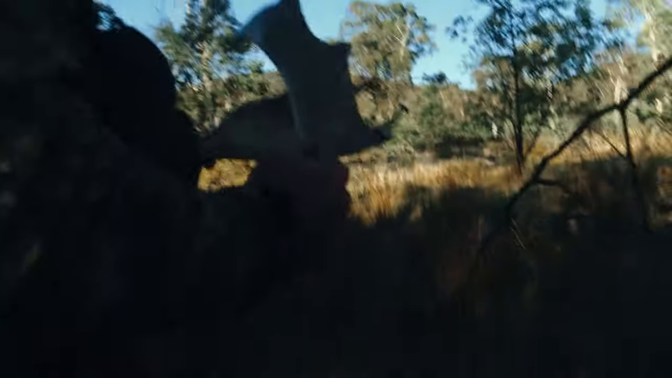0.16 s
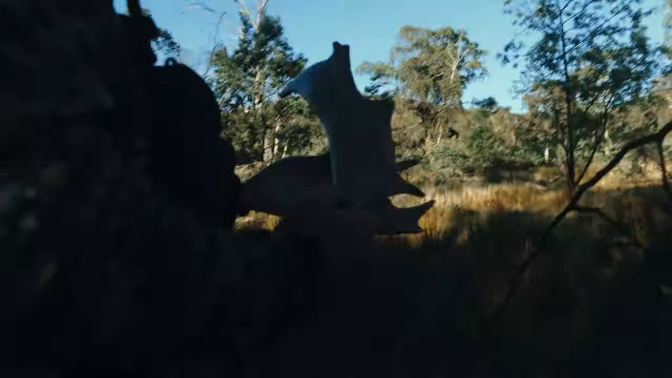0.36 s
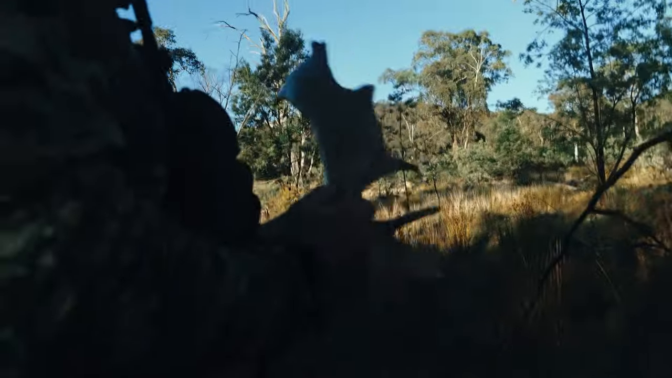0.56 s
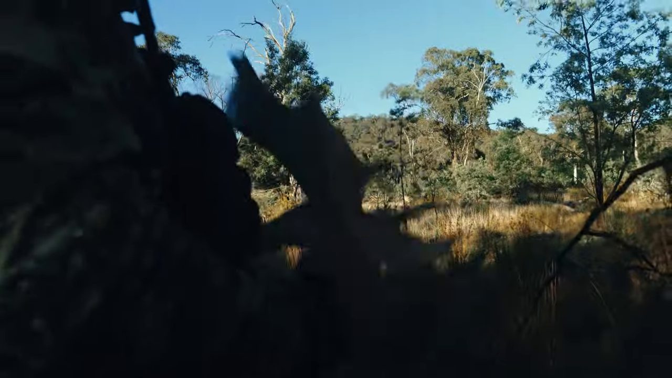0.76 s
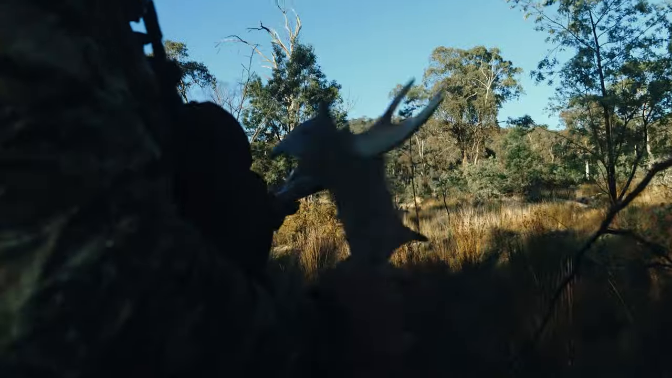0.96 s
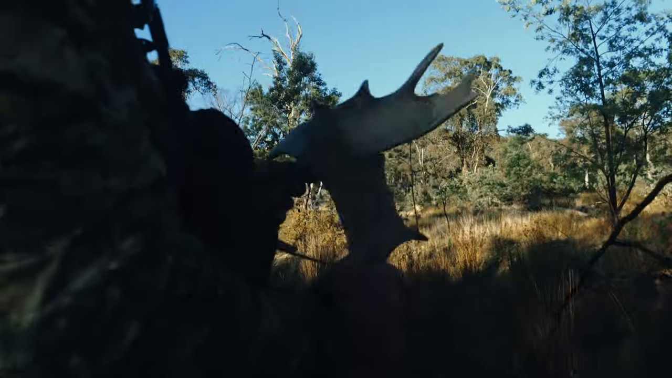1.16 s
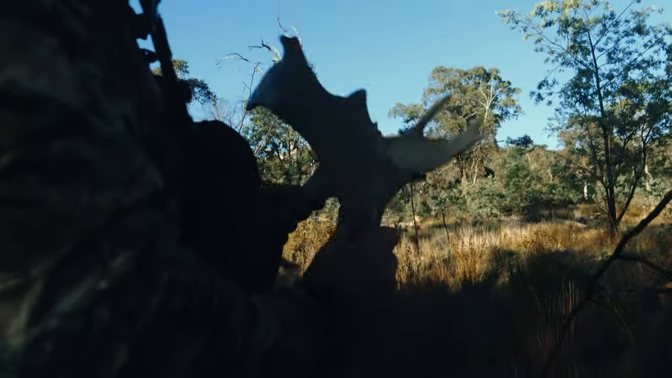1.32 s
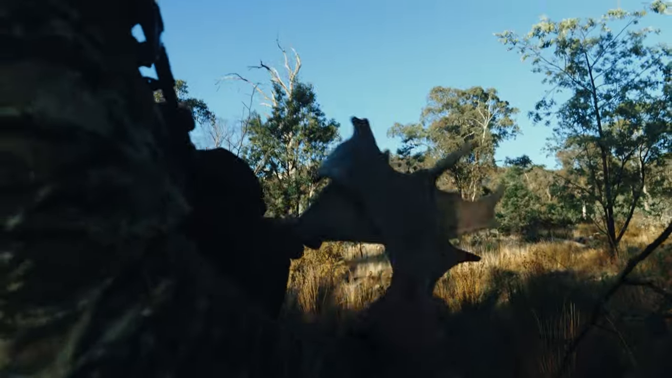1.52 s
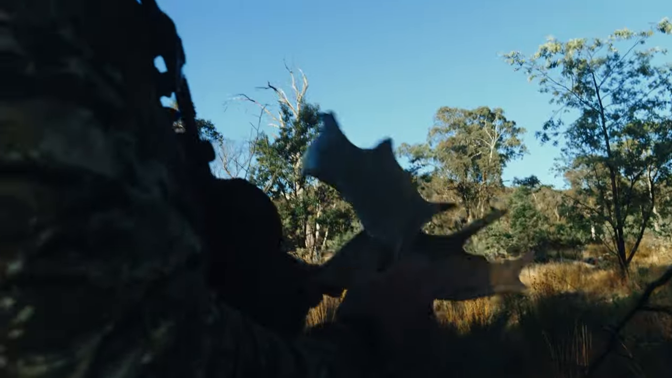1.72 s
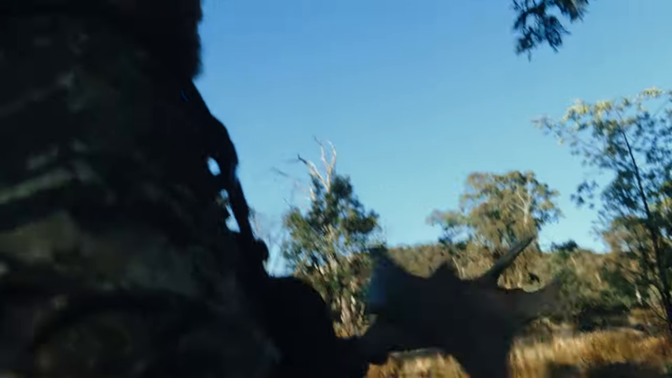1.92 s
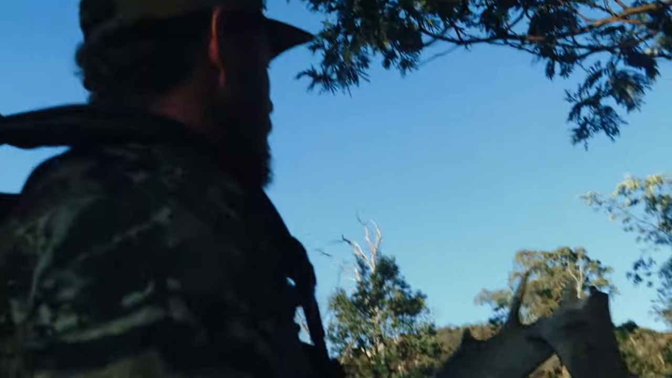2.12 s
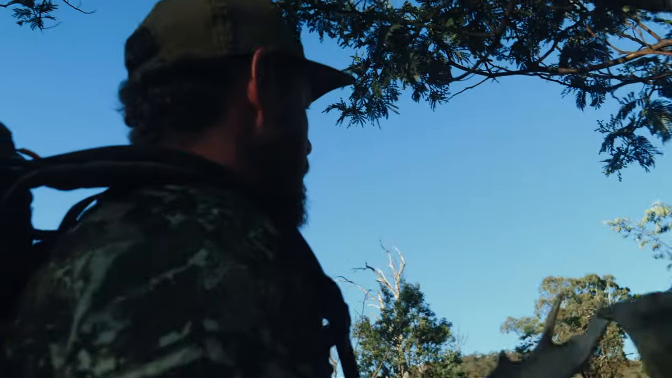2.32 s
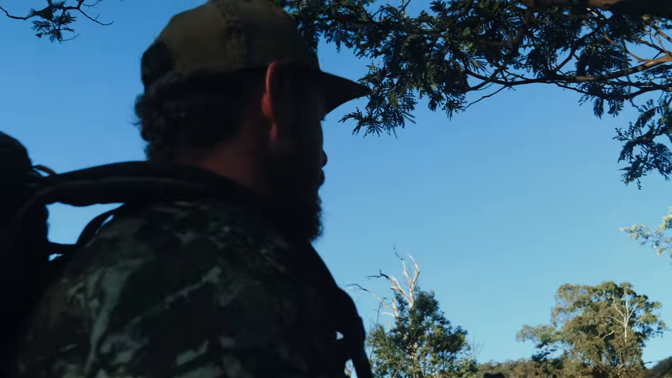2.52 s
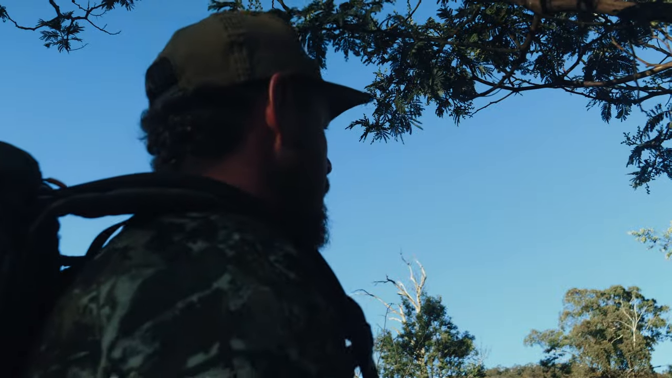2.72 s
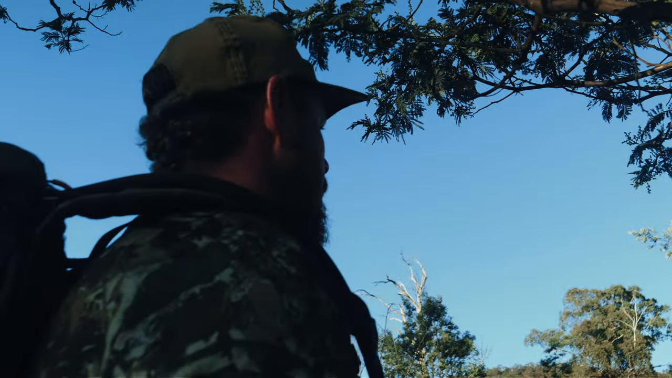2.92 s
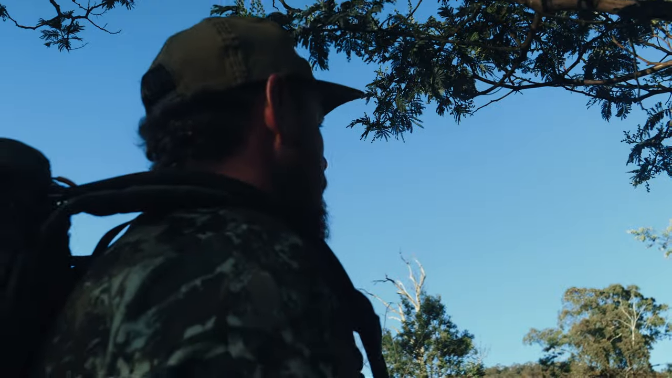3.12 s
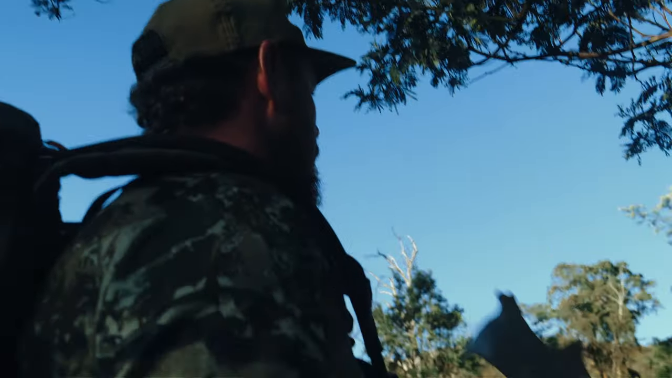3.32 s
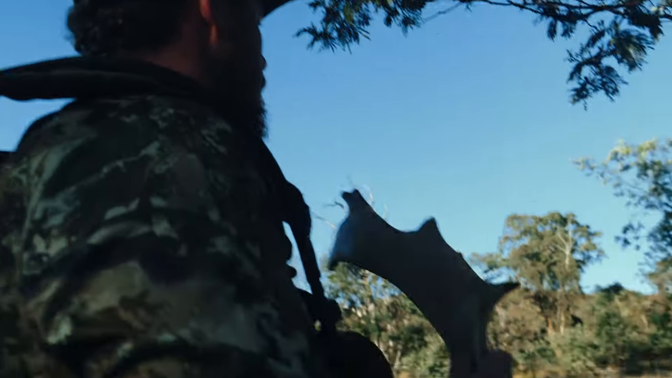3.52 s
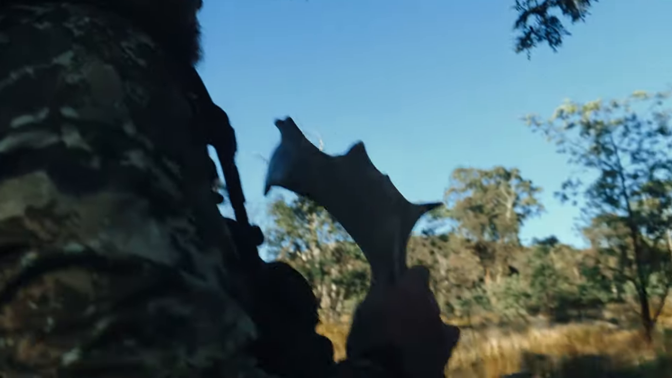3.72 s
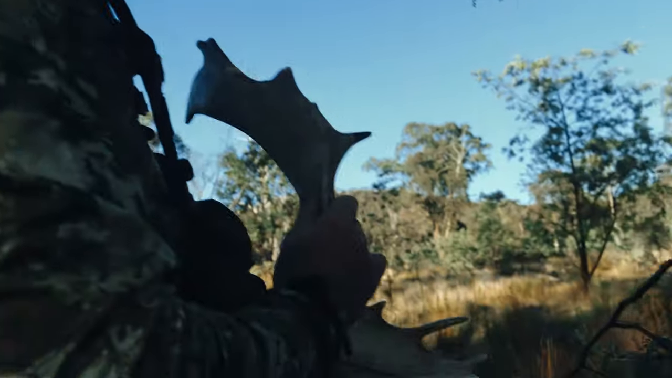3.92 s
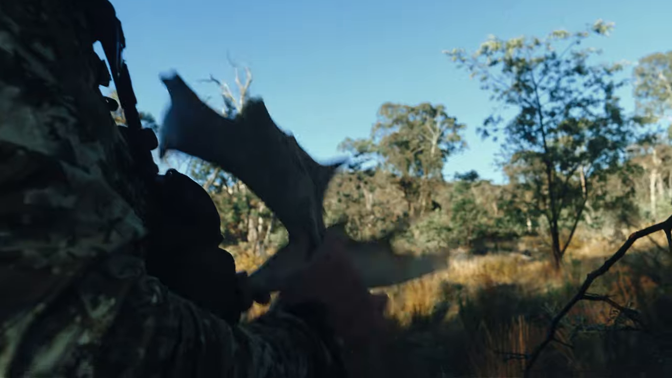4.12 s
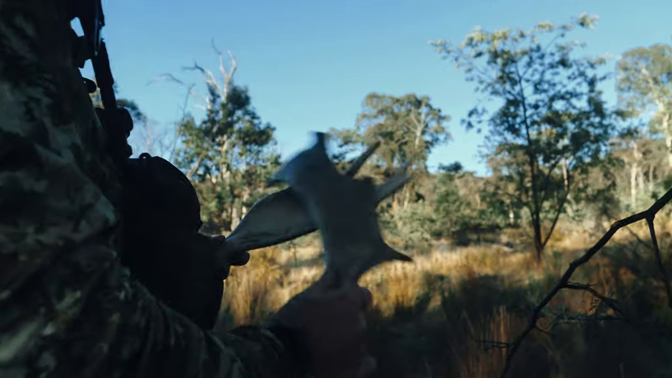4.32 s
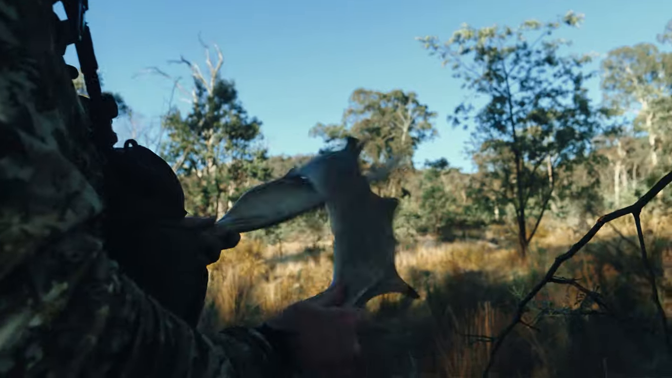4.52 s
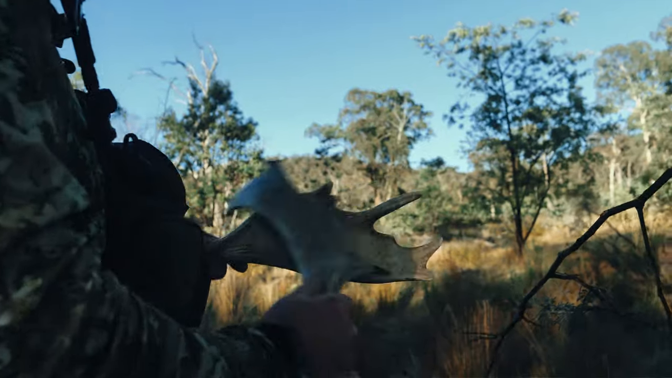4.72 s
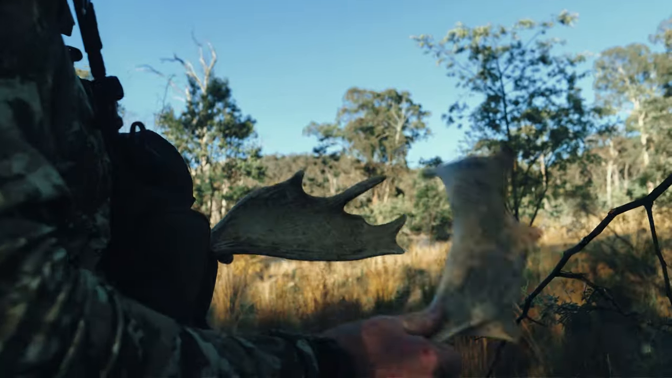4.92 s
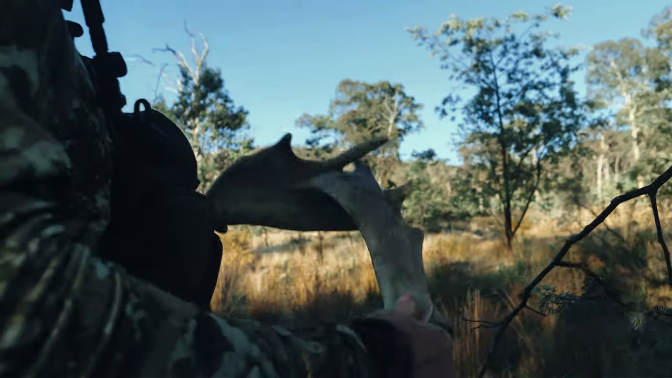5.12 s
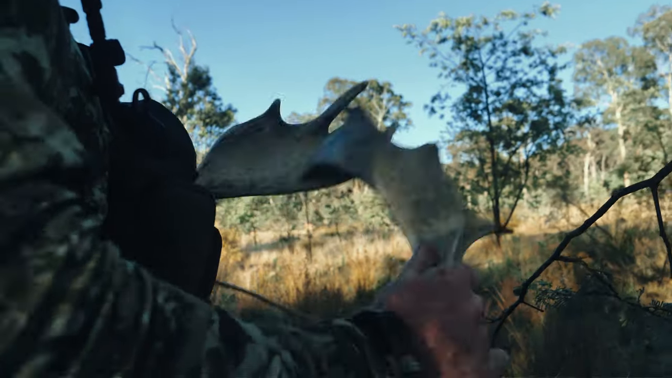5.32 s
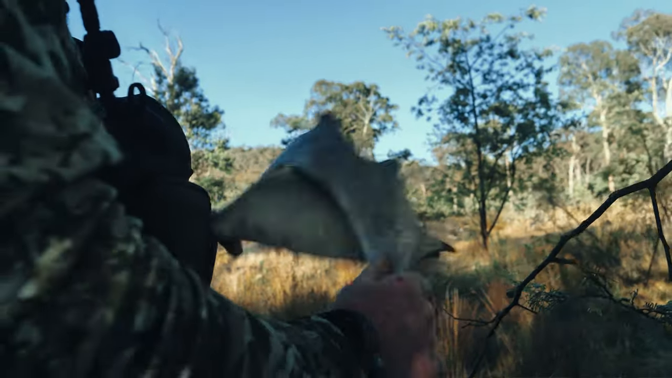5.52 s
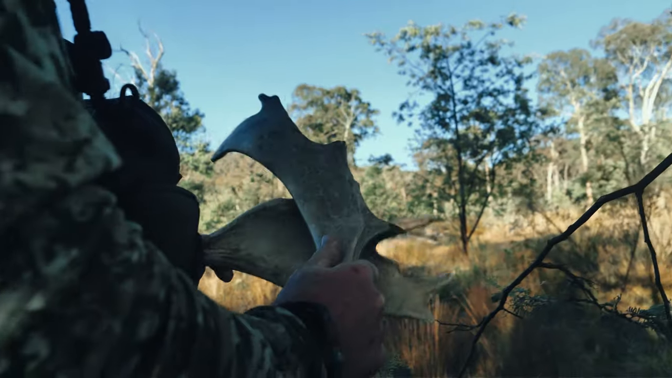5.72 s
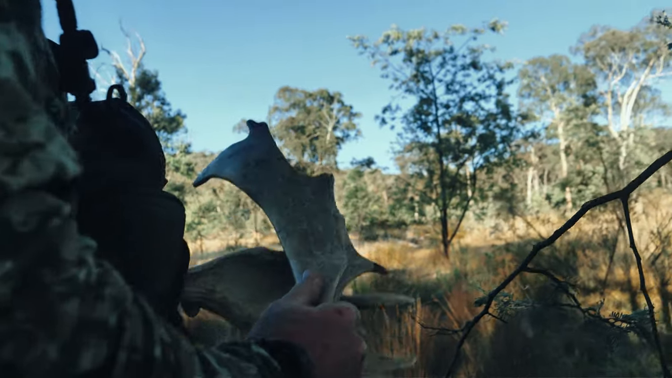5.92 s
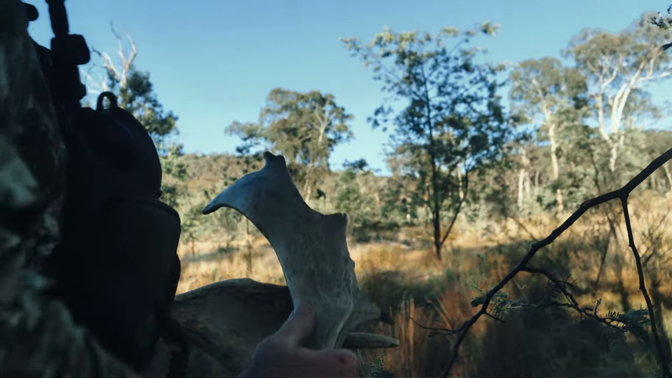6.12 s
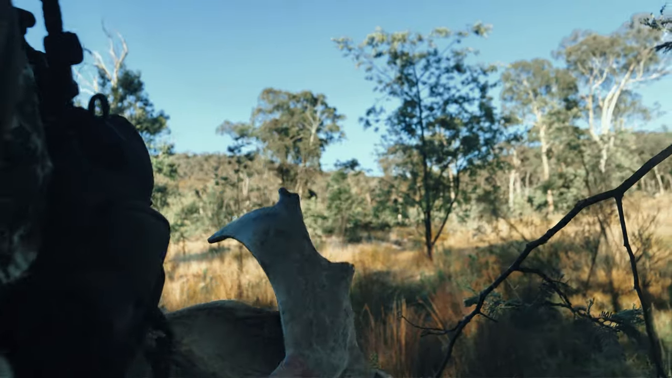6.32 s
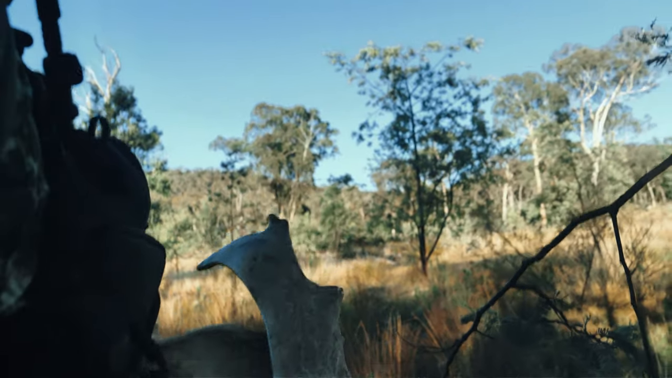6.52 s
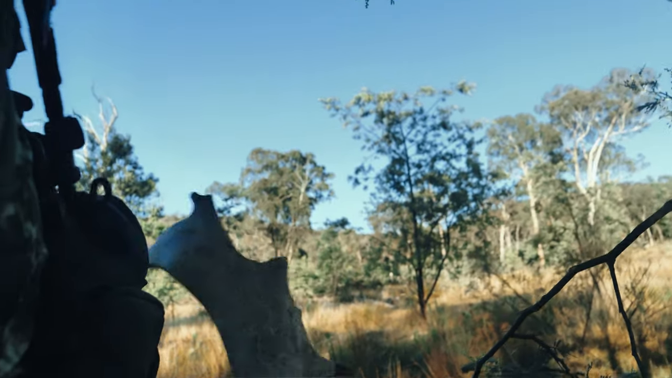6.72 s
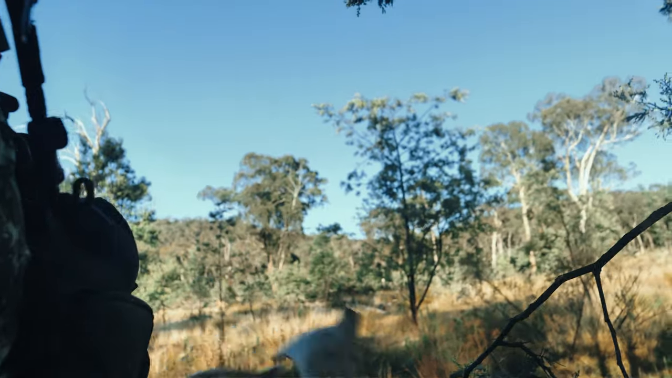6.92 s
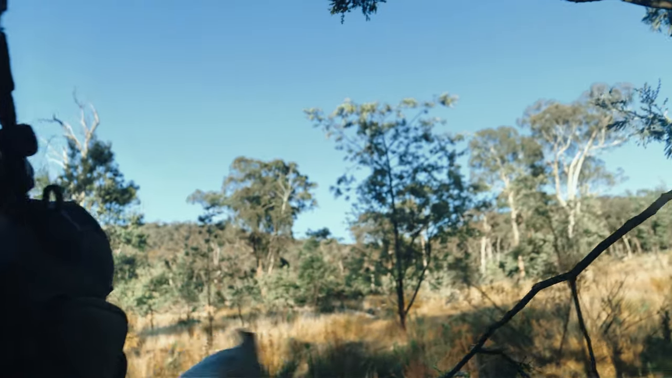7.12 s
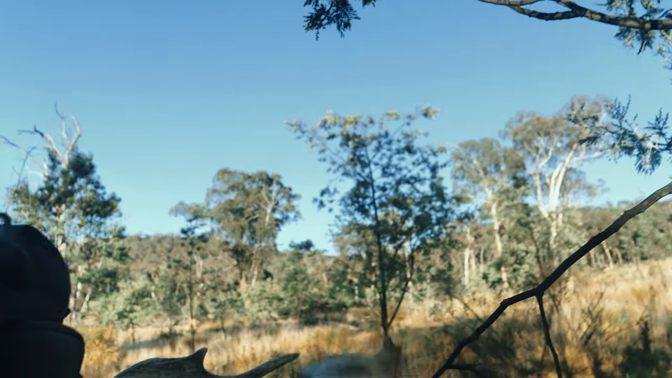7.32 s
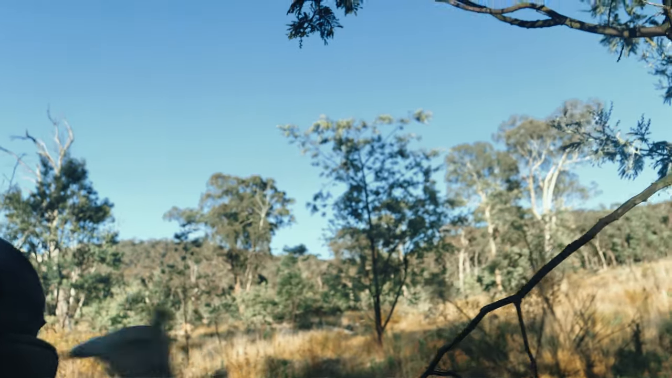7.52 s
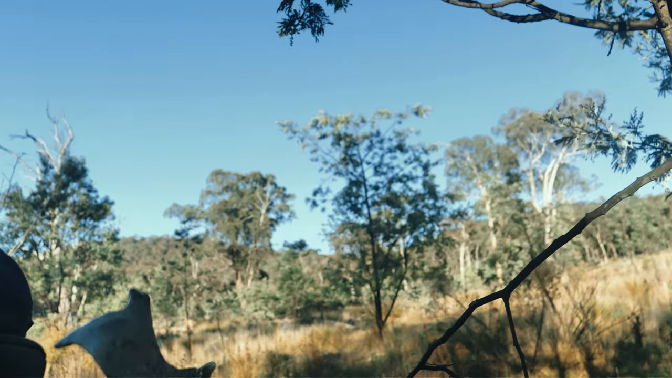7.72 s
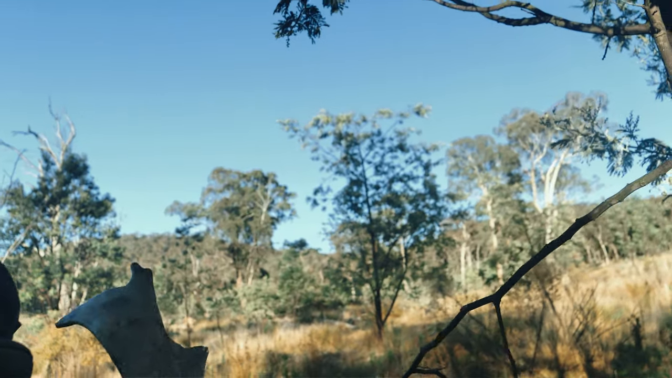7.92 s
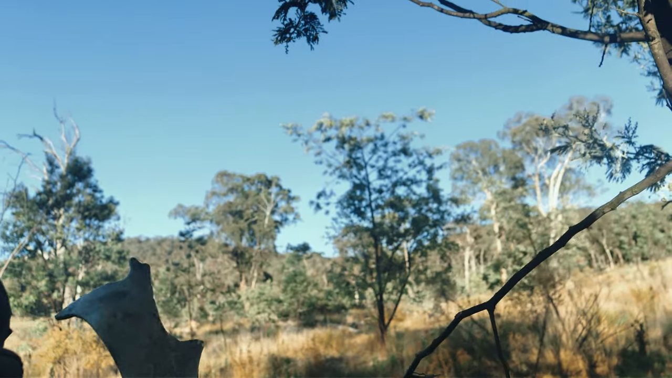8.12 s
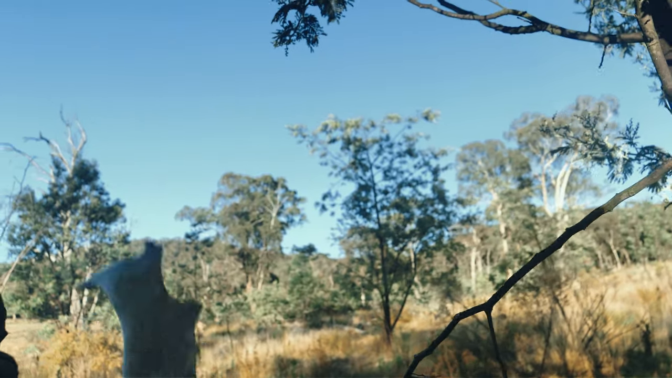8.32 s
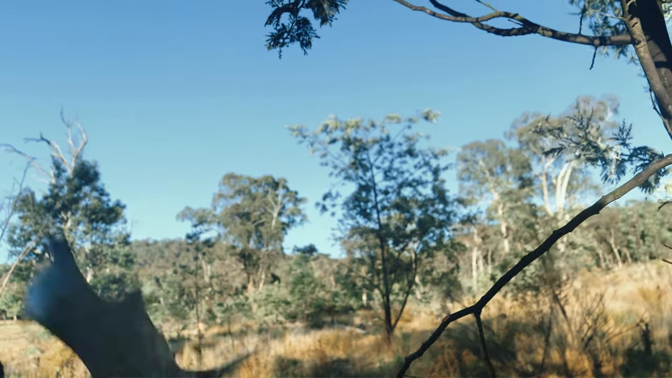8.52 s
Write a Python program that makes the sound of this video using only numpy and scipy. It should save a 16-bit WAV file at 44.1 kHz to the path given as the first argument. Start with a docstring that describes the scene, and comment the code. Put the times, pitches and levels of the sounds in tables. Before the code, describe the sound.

Hard hollow antler knocks come in clattering clusters close to the microphone, separated by quiet gaps with light cloth rustle and soft thuds.

```python
"""Open scrub: two palmate antlers are clashed and rattled in bursts, close to a camera.
Each clash is a cluster of contacts that excite the damped modes of the bone.
The hardest blows overload the microphone, and bushes and trees answer faintly by scattering.
Soft handling bumps, rustling clothes, clicks of gear and a little wind, made of shaped noise
and damped tones, fill the pauses."""
import sys
import numpy as np
from scipy import signal
from scipy.fft import rfft, irfft, next_fast_len
from scipy.io import wavfile
from scipy.ndimage import map_coordinates

SR = 44100
rng = np.random.default_rng(int(sys.argv[2]) if len(sys.argv) > 2 else 0)


def bounce(signal):
    """Save signal as a 16-bit WAV file at the path given by the first command-line argument."""
    frames = np.transpose(np.atleast_2d(signal))
    limited = np.clip(frames, -1, 1)
    pcm = np.round(limited * 32767).astype(np.int16)
    wavfile.write(sys.argv[1], SR, pcm)


N = 377496  # length in samples

# Wind on the microphone. Each row: time in seconds, buffet level in dB before the wind gain.
WIND_LEVEL = [(0.0, -55.5), (0.45, -53.5), (1.1, -68), (2.34, -68), (2.64, -79.5), (3.05, -70),
              (4.1, -65.5), (4.55, -70), (6.79, -67.5), (7.01, -76.5), (7.6, -65.5), (8.56, -72.5)]
# Noise colours of wind, hands, clothes and bush. Each row: frequency in Hz, relative density in dB per Hz.
WIND_COLOUR = [(10, -5.5), (18, 3.5), (30, -6.5), (42, -12.5), (60, -19), (85, -33.5), (130, -47.5),
               (300, -120)]
RUB_COLOUR = [(35, -23.5), (65, 1), (100, -5), (200, -9), (300, -5.5), (450, -15.5), (1200, -32.5),
              (2600, -88)]
CLOTH_COLOUR = [(300, -21.5), (600, -5.5), (1500, -4.5), (2700, -6), (4300, -11.5), (5700, -8),
                (8800, -14.5), (12800, -18), (16000, -30)]
AIR_COLOUR = [(60, -19.5), (110, -9.5), (180, -16.5), (300, -10), (400, -16), (900, -19.5), (1600, -19),
              (4000, -23.5), (7000, -28), (12000, -37), (16000, -46)]
# Shifts of the arms. Each row: middle in seconds, length in seconds, then in dB the rub of the hands,
# the swish of the sleeves and the hiss of the fabric.
ARM_MOVES = [(0.062, 0.16, -55.5, -62, -62.5), (0.38, .2, -62.5, -71.5, -67), (.68, 0.55, -70, -73, -72.5),
             (1.309, .5, -78, -86, -94), (1.801, 0.33, -83, -78.5, -88.5), (2.279, .4, -80, -71.5, -80),
             (3.297, 0.49, -72, -100, -100), (4.02, 0.8, -67, -77.5, -77), (6.0, .22, -94, -77.5, -70),
             (6.234, 0.24, -96, -67.5, -72.5), (6.7, 0.49, -74, -80.5, -84), (7.8, .25, -96, -93, -86),
             (8.248, 0.57, -107, -100, -82)]
# Tiny clicks of gear. Each row: time in seconds, nominal peak level in dB.
GEAR_TICKS = [(0.636, -55), (.73, -59), (2.291, -55), (3.464, -58), (7.955, -56), (8.157, -62.5),
              (8.315, -62.5)]
# Handling bumps. Each row: time in seconds, low thud in dB, dull tap in dB.
HANDLING_BUMPS = [(0.11, -47.5, -44.5), (0.377, -39, -42.5), (0.483, -47.5, -67), (0.838, -49.5, -54),
                  (1.977, -47, -59), (2.254, -55.5, -75), (3.264, -36.5, -56.5), (3.552, -42.5, -57),
                  (3.778, -41.5, -58), (3.848, -39, -56), (3.956, -33, -53.5), (4.228, -34, -48),
                  (5.433, -52, -50.5), (6.54, -35, -56), (6.728, -54, -69.5)]
# Low thumps of the overloaded microphone. Each row: time in seconds, thump in dB,
# time scale of the thump in seconds, slow swing in dB.
OVERLOAD_THUMPS = [(0.888, -32, 0.0026, -33), (1.041, -50.5, 0.0017, -50), (1.501, -40.5, .0014, -51),
                   (2.003, -28.5, 0.0011, -43.5), (4.257, -21.5, 0.0011, -30.5), (5.107, -31.5, .0012, -45),
                   (6.919, -43.5, 0.0012, -63.5), (7.571, -32, 0.001, -58)]
# Scattering by ground and near bushes, then by far trees. Each row: frequency in Hz, t60 in seconds.
SCRUB_DECAY = [(200, 0.14), (1500, 0.07), (5000, 0.15), (14000, 0.1)]
TREE_DECAY = [(200, 0.5), (1500, 2), (4000, 0.6), (8000, .35), (14000, 0.18)]
# Clearest modes of the two antlers. Each row: frequency in Hz, relative level in dB, t60 in seconds,
# share 0-1 that lives in the flat palm. The grip retunes the first row.
BONE_MODES = [(361.9, -13.5, 0.19, 0), (400, -4, 0.039, 0.4), (431.5, -8.5, 0.058, 0.1),
              (587, -8, 0.044, 0.07), (790, -8, 0.026, 0.11), (878, -6, 0.058, 0), (935, -2, 0.032, 0),
              (1250.2, -0.5, 0.054, 0.1), (1310, -4, 0.06, 0), (1465, 1.5, 0.041, 1), (1645, 0, 0.041, .5),
              (1840, 1.5, 0.027, 0.6), (1888, 2.5, 0.022, 1), (2212, -2.5, 0.045, 0.05),
              (2528, -0.5, 0.022, 0.8), (2773, 0, 0.024, 0), (3250, -4, 0.021, 0),
              (3808, -2.5, 0.025, 0.02), (5140, -12, 0.03, 0), (5810, -5, 0.019, 0)]
# Crowd of weaker modes between them. Each row: frequency in Hz, relative level per mode in dB.
CROWD_LEVEL = [(120, -25), (300, -24.5), (700, -9.5), (1100, -9.5), (1700, -12), (2500, -7.5), (3500, -8.5),
               (5200, -9.5), (6500, -18.5), (8200, -14), (10500, -27), (13500, -30), (16000, -31.5)]
# How fast the crowd dies. Each row: frequency in Hz, t60 in seconds.
CROWD_T60 = [(150, 0.0078), (500, 0.018), (1500, 0.042), (4000, 0.022), (9000, 0.017), (15000, 0.012)]
# Where soft contacts sound most. Each row: frequency in Hz, share 0-1.
SOFT_PALM_BAND = [(1200, 0.04), (1500, .8), (1900, 0.94), (2300, 0)]
# The grip changes between clashes. Each row: start in seconds, how freely the palm rings in dB,
# lowest bending note in Hz, how freely that note rings in dB.
GRIPS = [(0, 7, 428, 5), (1.0, -3.5, 385, -6.5), (1.4, 10, 366, 2.5), (1.9, 0, 385, 1.5), (2.4, 3, 365, -3),
         (4.1, -2, 368, -0.5), (4.41, -0.5, 380, -0.5), (4.6, -0.5, 420, -0.5), (5.0, -3, 355, 0.5),
         (5.5, -1, 360, 0.5), (6.8, -1, 365, 2), (7.22, -8.5, 358, -2), (7.5, 0, 364, -1)]
# Tines sliding or lightly rattling: dense catches scrape, sparse ones click. Each row: start in seconds,
# end in seconds, mean grain level in dB before the overall antler gain, bright tilt in dB,
# catches per second.
TINE_CATCHES = [(1.053, 1.094, -55, -13, 400), (1.195, 1.238, -59, -16.5, 440), (1.56, 1.594, -45, -8, 640),
                (1.621, 1.685, -48.5, -6, 73), (2.872, 2.976, -68, -36, 200),
                (4.258, 4.318, -44.5, 1.5, 400), (4.331, 4.379, -44, 5, 97), (4.454, 4.485, -38.5, -9, 304),
                (4.494, 4.54, -56, -13.5, 380), (4.539, 4.573, -45, -8, 370), (4.653, 4.729, -46, -7, 300),
                (4.735, 4.788, -52, -4, 270), (5.122, 5.165, -48.5, 4.5, 430),
                (5.611, 5.684, -40.5, -1, 105), (6.99, 7.061, -48.5, -2.5, 107),
                (7.111, 7.224, -49, -8, 220), (7.255, 7.27, -40.5, 17.5, 200),
                (7.6, 7.671, -42.5, -12, 300)]
# Antler on antler. Each row: time in seconds, blow level in dB before the overall antler gain, body tilt
# in dB (more when the palm is hit), bright tilt in dB (more when hard tines meet), frequency in Hz that
# the struck spot favours, level in dB of each bounce over the contact before.
ANTLER_BLOWS = [(0.8872, -8, -2, 6.5, 1982, -29.5), (0.9576, -27.5, 2.5, 6.5, 1330, -18),
                (1.0373, -19, 8, -10, 1446, -20.5), (1.103, -31.5, -3.5, 2, 3240, -15),
                (1.1168, -29, -4.5, 9, 3180, -9.5), (1.1934, -31, 12.5, -19.5, 1690, -9),
                (1.5036, -9.5, -4.5, 7.5, 1552, -22.5), (1.5428, -26.5, -15, -4, 1780, -14.5),
                (1.5529, -18.5, -10.5, 1.5, 1650, -16), (1.5764, -29.5, -5, -0.5, 1960, -12),
                (1.6539, -38, -7, -11.5, 1400, -19), (1.9951, -8, -11, 9, 2146, -22.5),
                (2.02, -28, 0.5, 2, 1450, -15.5), (2.0611, -25, -7, 4, 1260, -22.5),
                (2.0972, -35.5, 10, 13, 3630, -21), (2.118, -28.5, 0, 6, 1276, -9),
                (2.134, -28.5, 3, 12, 3460, -11.5), (2.4758, -13, -7.5, 9.5, 1290, -25.5),
                (2.4822, -19, -1.5, -11, 1767, -5), (2.5086, -24, -12, 0, 1558, -19),
                (2.5154, -24.5, -1, -7.5, 1645, -5), (2.621, -51.5, 6, -28, 1910, -20),
                (2.718, -54.5, 10.5, -16, 1595, -3), (2.944, -52.5, 13, -28, 1542, -13),
                (4.25, -11.5, -7.5, 13.5, 2856, -20.5), (4.2569, -13, -5, 0.5, 2230, -20),
                (4.2789, -25, -7.5, -2.5, 1650, -18), (4.2975, -30, -3.5, 6, 3120, -11.5),
                (4.3519, -31.5, -4, -5, 2010, -19), (4.379, -32, 3.5, -9, 1960, -6.5),
                (4.4432, -15.5, -10.5, -10.5, 2260, -20.5), (4.4505, -20, -12, -0.5, 3100, -11),
                (4.5778, -20.5, -4, 2, 5100, -22.5), (4.6145, -17, -3, 2.5, 1260, -23.5),
                (4.6496, -25.5, 4, 11, 5100, -6.5), (4.6581, -19.5, -7.5, -12.5, 1380, -13),
                (4.6626, -25.5, 3, 10.5, 1460, -11.5), (4.6848, -29, 1, 1.5, 1830, -7.5),
                (4.695, -17, 2.5, 7, 1900, -13.5), (4.7119, -28, 12, 4.5, 898, -13.5),
                (4.7212, -28, -2.5, -2, 3870, -5), (4.7963, -24, -5, -10, 1223, -22.5),
                (4.8139, -27, 0, -12, 1310, -22), (5.1072, -17, 3, 8, 4973, -19),
                (5.1125, -13, -6.5, 2, 2900, -11), (5.1458, -31.5, 13.5, 1, 1880, -13.5),
                (5.1518, -23, -2, -10, 2670, -9), (5.177, -35.5, -0.5, -7.5, 1860, -8.5),
                (5.343, -31.5, 10, -6.5, 940, -8), (5.3585, -21, -4, -5.5, 1900, -11.5),
                (5.3683, -11, -7, 10, 3170, -16), (5.57, -15, -0.5, 11, 3090, -21),
                (5.575, -14.5, 4, 1.5, 3180, -20), (5.6064, -18, -5, 0.5, 1710, -7),
                (5.641, -24.5, 0.5, 2, 2840, -8), (5.6659, -33, 9, -4, 1620, -16),
                (5.726, -45, 13, -14, 1446, -10), (5.789, -56.5, 12, -5, 1430, -7),
                (6.92, -10.5, 0.5, 10, 2258, -16), (6.9448, -25, -2.5, 6, 1890, -15),
                (6.9592, -32, -9, 5.5, 1850, -9), (6.9741, -23, -5, -7, 1860, -14.5),
                (6.9825, -28.5, -1, 3.5, 1780, -6), (7.0604, -33, 6.5, -1.5, 1915, -12.5),
                (7.1058, -22, 0.5, -5, 1795, -31), (7.136, -29, 8, -4.5, 1890, -19),
                (7.163, -20, 2.5, 7, 4900, -21.5), (7.178, -30, -4.5, 5.5, 2340, -1),
                (7.2375, -16, 0.5, 1, 3920, -10.5), (7.2701, -21, 4, 11, 3890, -14),
                (7.2952, -23.5, 7.5, 11, 1885, -25.5), (7.572, -12, -0.5, 8, 5490, -14),
                (7.602, -25, -4, 4, 1546, -17), (7.616, -32.5, 0, 4.5, 1700, 2),
                (7.6529, -32, -2, -2.5, 1840, -10)]

TOP_HZ = 16300  # the sound holds nothing above about 16 kHz
HISS_HZ = 4200  # where the swish gives way to the hiss
PALM_HZ = 1810  # bounces and slips ring the palm most
DETUNE = .018  # spread, as a share, of the tine modes under a new grip; the palm keeps its pitch
# tines spring apart and meet again: first flight, next flight over it, its random spread, treble lost
BOUNCE_S, BOUNCE_SHRINK, BOUNCE_SPREAD, BOUNCE_DULL_DB = .007, 0.95, .06, 3.5


def amp(db):
    """Logarithmic level: decibels to an amplitude gain."""
    return np.exp(np.asarray(db) * (np.log(10) / 20))


def unit(x):
    """Normalised power: scale to rms 1."""
    return x / np.sqrt(np.mean(x ** 2) + 1e-20)


def along(points, hz):
    """Logarithmic pitch: interpolate (Hz, value) points on a log axis."""
    f, v = np.transpose(points)
    return np.interp(np.log(hz + 1), np.log(f + 1), v)


def curve(rows):
    """Linear interpolation: one value per sample from (seconds, value) rows."""
    return np.interp(np.arange(N) / SR, *np.transpose(rows))


def wobble(rate):
    """Slow random fluctuation: a smooth curve through rate random knots a second."""
    knots = rng.standard_normal(int(N * rate / SR) + 4)
    return map_coordinates(knots, [np.arange(N) * rate / SR])


def filtered(x, response):
    """Linear filtering: the spectrum of x times a response of frequency."""
    m = next_fast_len(N + SR // 2)
    spectrum = rfft(x, m) * response(np.fft.rfftfreq(m, 1 / SR))
    return irfft(spectrum, m)[:N]


def noise(spectrum):
    """Spectral shaping: random noise of rms 1 with the given colour."""
    white = rng.standard_normal(N)
    return unit(filtered(white, lambda hz: amp(along(spectrum, hz))))


def placed(times, sounds):
    """Superposition: add each sound to the time line at its moment."""
    out = np.zeros(N + SR)
    for s, sound in zip(times, sounds):
        out[round(s * SR):][:len(sound)] += sound
    return out[:N]


def movements():
    """Amplitude modulation: rub, swish and hiss swell and fade as bell curves with each arm move."""
    middle, length, *levels_db = np.transpose(ARM_MOVES)
    from_middle = np.arange(N) / SR - middle[:, None]
    swells = np.exp(-2 * (from_middle / length[:, None]) ** 2)
    return np.sqrt(amp(levels_db) ** 2 @ swells ** 2)  # moves that overlap add in power


def surroundings(wind_db=5, rub_db=0, cloth_db=0, air_db=-78.0, lumps_db=3):
    """Turbulence and friction as modulated noise: wind on the microphone, hands, clothes, faint bush hiss."""
    grip_db, folds_db = 2.5 * wobble(22), 1.3 * wobble(35)
    rubbing, swishing, hissing = movements()
    wind = amp(curve(WIND_LEVEL) + wind_db + lumps_db * wobble(8)) * noise(WIND_COLOUR)
    rub = rubbing * amp(rub_db + grip_db) * noise(RUB_COLOUR)
    fabric = noise(CLOTH_COLOUR)
    swish = filtered(fabric, lambda hz: 1 / (1 + (hz / HISS_HZ) ** 6))
    hiss = fabric - swish
    cloth = amp(cloth_db + folds_db) * (swishing * swish + hissing * hiss)
    return wind + rub + cloth + amp(air_db) * noise(AIR_COLOUR)


def ticks(t60=0.021):
    """Impulsive excitation: straps and buckles give thin clicks, noise under an exponential decay."""
    s, peak_db = np.transpose(GEAR_TICKS)
    t = np.arange(SR // 20) / SR
    # 7 dB allows for noise peaks above the rms
    decays = amp(peak_db[:, None] - 7 - 60 * t / t60)
    return placed(s, decays) * noise([(500, -25), (3000, 8), (7000, -3), (13000, -6), (16000, -20)])


def bumps(thud_hz=192, thud_t60=0.066, tap_t60=0.06):
    """Damped resonance: a soft push rings one low mode of the camera body, with a dull tap on top."""
    s, thud_db, tap_db = np.transpose(HANDLING_BUMPS)
    t = np.arange(SR // 8) / SR
    hz = thud_hz * (1 + .05 * rng.standard_normal((len(s), 1)))
    thud = np.sin(2 * np.pi * hz * t) * amp(-60 * t / thud_t60) * (1 - np.exp(-t / .001))
    tap = noise([(60, 1.0), (350, -8.5), (800, -14.0), (2500, -47), (9000, -54.5)])
    tap_decays = amp(tap_db[:, None] - 60 * t / tap_t60)
    return placed(s, amp(thud_db)[:, None] * thud) + tap * placed(s, tap_decays)


def overload_thumps(swing_hz=23, swing_t60=0.15):
    """Overload and recovery: a low thump as the microphone is driven, then its slow swing back to rest."""
    s, thump_db, thump_s, swing_db = np.transpose(OVERLOAD_THUMPS)
    t = np.arange(SR // 2) / SR
    u = t / thump_s[:, None]
    thump = (2 - u) * u * np.exp(1 - u)
    swing = np.sin(2 * np.pi * swing_hz * t) * amp(-60 * t / swing_t60)
    return placed(s, amp(thump_db)[:, None] * thump + amp(swing_db)[:, None] * swing)


def scattered(x, decay, build):
    """Diffuse scattering: weak reflections build up over milliseconds and die at a speed set by frequency."""
    # the tail ends at 1.5 s
    hz, t, z = signal.stft(rng.standard_normal(SR * 3 // 2), SR, nperseg=256)
    fade = amp(-60 * t / along(decay, hz)[:, None]) * (1 - np.exp(-t / build))
    tail = signal.istft(z * fade, SR, nperseg=256)[1]
    return signal.fftconvolve(x, tail / np.linalg.norm(tail))[:N]


def catches(scatter_db=3.5, body_db=-2, count=28):
    """Intermittent contact: tines slide or rattle in tiny uneven catches; dense ones scrape, sparse ones click."""
    rows = []
    for start, end, grain_db, bright_db, rate in TINE_CATCHES:
        when = start + (np.arange(count) + rng.random(count)) / rate
        catch_db = grain_db + scatter_db * rng.standard_normal(count)
        size_db = np.where(when < end, catch_db, -np.inf)  # silent after the end
        rows += [(s, db, body_db, bright_db, PALM_HZ) for s, db in zip(when, size_db)]
    return rows


def contacts(count=2):
    """Inelastic rebound: each blow is followed by bounces, duller and mostly weaker, after shrinking flights."""
    rows = []
    for s, blow_db, body_db, bright_db, favour_hz, bounce_db in ANTLER_BLOWS:
        rows.append((s, blow_db, body_db, bright_db, favour_hz))
        spread = np.exp(BOUNCE_SPREAD * rng.standard_normal(count))
        flights = BOUNCE_S * BOUNCE_SHRINK ** np.arange(count) * spread
        for k, later in enumerate(np.cumsum(flights), 1):
            rows.append((s + later, blow_db + k * bounce_db, body_db, bright_db - k * BOUNCE_DULL_DB, PALM_HZ))
    return rows


def antler_modes(count=260):
    """Modal density: pitch, level, decay and palm share of the clear modes and the crowd of weaker ones."""
    steps = (np.arange(count) + rng.random(count)) / count
    hz = 100 + (TOP_HZ - 100) * steps ** 1.6
    crowd = np.transpose([hz, along(CROWD_LEVEL, hz), along(CROWD_T60, hz), np.zeros(count)])
    return np.vstack([BONE_MODES, crowd]).T


def mode_strengths(hits, modes, palm_db, spot_db=3.5, focus_db=9.0, focus_octaves=0.052, sharpen=0.32,
                   soft_palm_db=3):
    """Modal participation: each contact lands on a new spot and drives modes with new strengths and signs."""
    _, blow_db, body_db, bright_db, favour_hz = hits.T[:, :, None]
    hz, mode_db, _, palm_share = modes
    # the broad palm gives body, hard tines give treble
    body = body_db * along([(600, 0.96), (1300, 0.015)], hz)
    bright = bright_db * along([(1800, 0.013), (6000, 0.99)], hz)
    # a stronger blow is shorter and reaches higher
    top = sharpen * (np.maximum(blow_db, -80) + 20.5) * along([(8000, 0), (14000, 1)], hz)
    softness = np.interp(blow_db, [-40, -20], [1, 0])
    palm = palm_db * palm_share + soft_palm_db * softness * along(SOFT_PALM_BAND, hz)
    # modes that swing widely at the struck spot take most of the blow
    spot = focus_db * np.exp(-.5 * (np.log2(hz / favour_hz) / focus_octaves) ** 2)
    spot = spot + spot_db * rng.standard_normal(spot.shape)
    signs = np.sign(rng.standard_normal(spot.shape))
    return signs * amp(mode_db + body + bright + top + palm + spot)


def mode_fades(modes, attack=.00005, crack=1.0, crack_time=.0012):
    """Exponential damping: each mode dies at its own speed, after a sharp crack from the struck spot."""
    hz, _, t60, _ = modes
    t = np.arange(SR // 9) / SR
    fades = amp(-60 * t / t60[:, None]) * (1 - np.exp(-t / attack))
    crack_share = along([(500, 0.1), (4000, 1.1), (12000, 2.3)], hz)[:, None]
    return fades * (1 + crack * crack_share * np.exp(-t / crack_time))


def mode_tones(modes, low_hz, low_db, size):
    """Boundary conditions: the grip shifts the tine modes and sets pitch and level of the lowest bending note."""
    hz, _, _, palm_share = modes
    held_hz = hz * (1 + DETUNE * (1 - palm_share) * rng.standard_normal(len(hz)))
    held_hz[0] = low_hz
    radians_per_sample = np.float32(2 * np.pi * held_hz / SR)
    tones = np.sin(np.outer(radians_per_sample, np.arange(size, dtype=np.float32)))
    tones[0] *= amp(low_db)
    return tones


def antlers(gain_db=-2.0, bass_cut_hz=250):
    """Modal superposition: blows, bounces and catches ring the same bone, held in the grip of the moment."""
    every_hit, modes = np.vstack([contacts(), catches()]), antler_modes()
    grip_of_hit = np.searchsorted(np.transpose(GRIPS)[0], every_hit[:, 0]) - 1
    clash, fades = np.zeros(N), mode_fades(modes)
    for k, (_, palm_db, low_hz, low_db) in enumerate(GRIPS):
        hits = every_hit[grip_of_hit == k]
        strengths = mode_strengths(hits, modes, palm_db)
        rings = strengths @ (fades * mode_tones(modes, low_hz, low_db, size=fades.shape[1]))
        # the blow sets the level of the first four milliseconds
        onset = np.sqrt(np.mean(rings[:, :SR // 250] ** 2, axis=1))
        gains = amp(hits[:, 1] + gain_db) / onset
        clash += placed(hits[:, 0], rings * gains[:, None])
    # narrow bone radiates little bass
    return signal.sosfilt(signal.butter(3, bass_cut_hz, 'high', fs=SR, output='sos'), clash)


def scene():
    """Superposition: the small sounds around, echoes from bushes and trees, and the antlers."""
    clash = antlers()
    near = amp(-33.5) * scattered(clash, SCRUB_DECAY, build=0.01)
    far = amp(-49.5) * scattered(clash, TREE_DECAY, build=0.032)
    return (surroundings() + ticks() + bumps() + overload_thumps() + far + near + clash)[None]


def record(dry, ceiling=.345):
    """Saturation: the hardest peaks are flattened; the sound holds nothing above about 16 kHz."""
    flattened = dry[0] / (1 + np.abs(dry[0] / ceiling) ** 8) ** (1 / 8)
    return filtered(flattened, lambda hz: 1 / np.sqrt(1 + (hz / TOP_HZ) ** 200))[None]


dry = scene()
out = record(dry)
bounce(out)
```